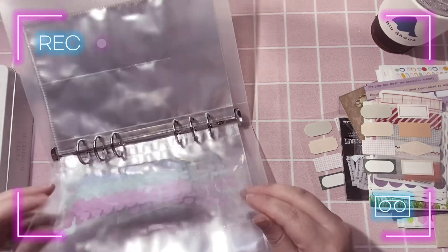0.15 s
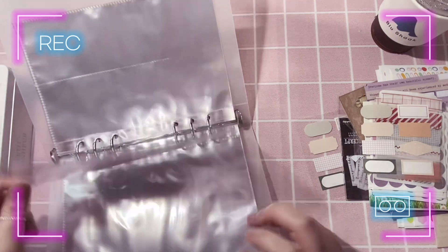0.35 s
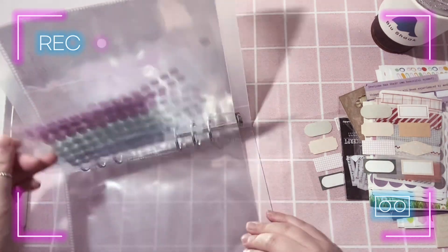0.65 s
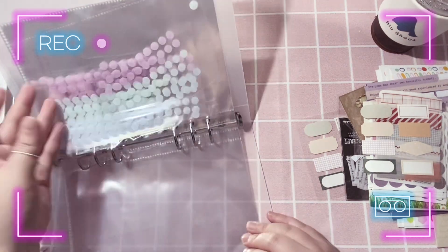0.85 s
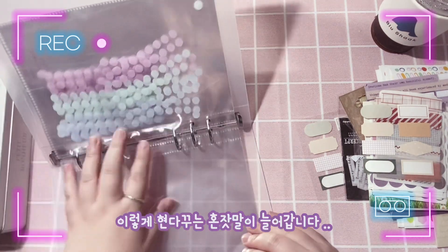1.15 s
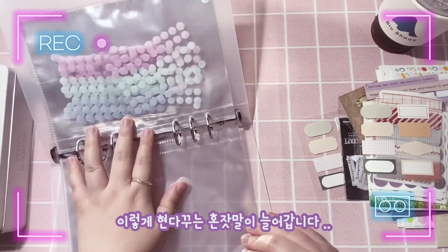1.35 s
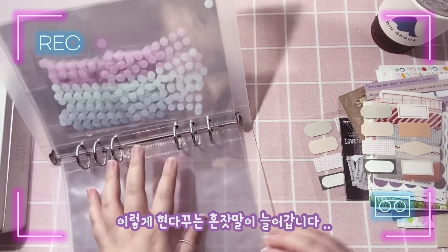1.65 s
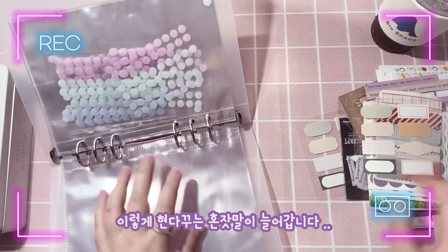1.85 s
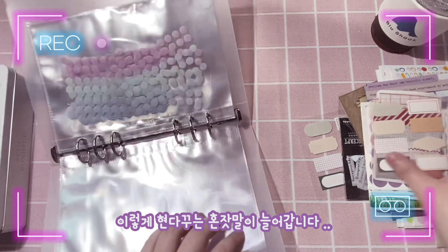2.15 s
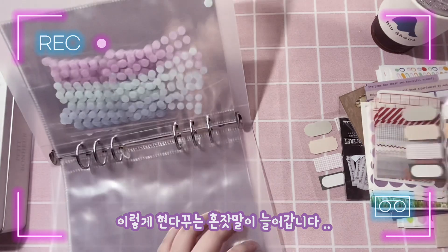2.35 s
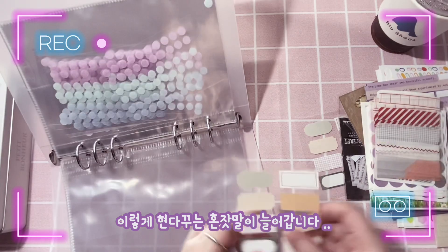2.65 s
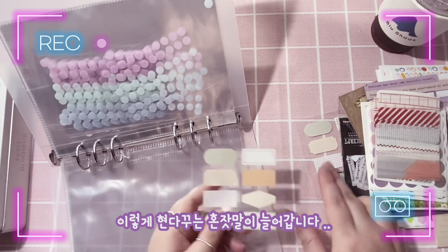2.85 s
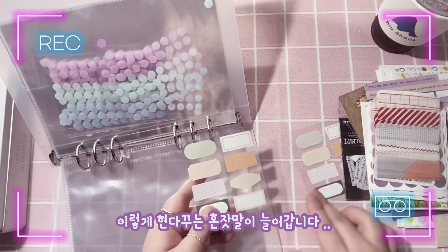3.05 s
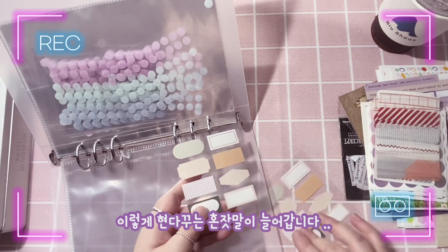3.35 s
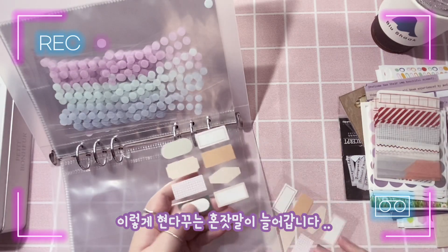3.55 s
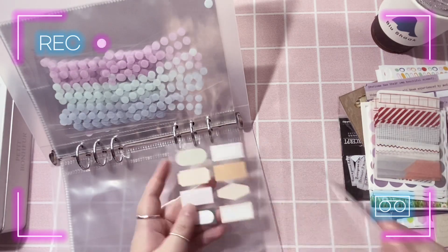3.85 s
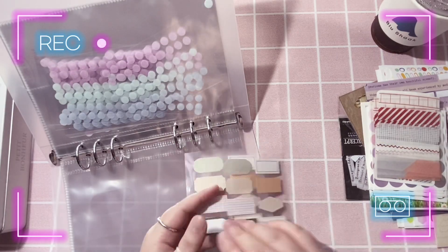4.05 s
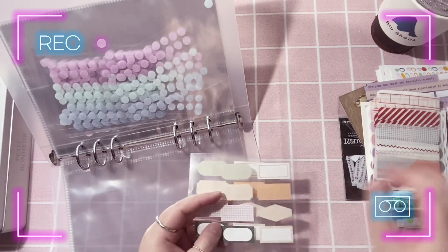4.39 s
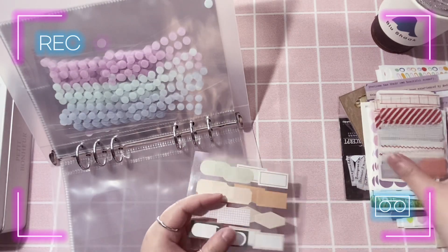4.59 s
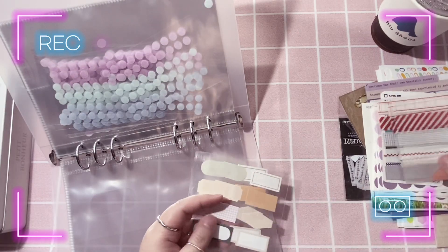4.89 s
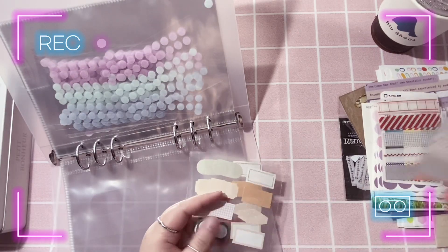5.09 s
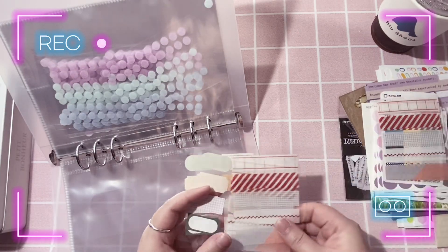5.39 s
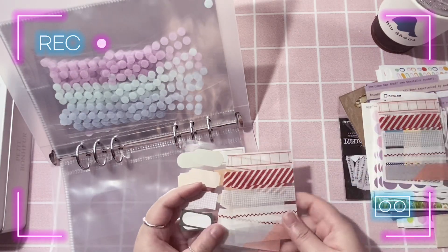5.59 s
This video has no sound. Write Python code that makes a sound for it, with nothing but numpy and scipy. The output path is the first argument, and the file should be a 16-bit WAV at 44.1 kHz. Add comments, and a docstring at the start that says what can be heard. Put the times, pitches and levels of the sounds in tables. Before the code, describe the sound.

Close-up handling of plastic film on a desk in a quiet room, in stereo. It opens mid-action: for the first 0.3 seconds a page crackles densely with bright snaps, grainy rustle and soft thuds. After a lull with a dull bump near 0.5, the page flips over at 0.7-0.9 with a creak and a crisp burst of crackles. Pats and crinkles follow at 1.1-1.3, a sharp click at 1.74, and a soft thud and crinkle around 2.05-2.15. Sticker sheets are gathered at 2.6-3.0 with short scrapes, a tiny creak and low bumps. Around 3.5-3.8 comes the brightest slide, a quick hissing swish at 3.65. Clear clicks sound near 4.16, then sparse, softer rustles to 5.0, a faint bump at 5.2 and a last small crinkle at 5.64. Short reflections, low hum and a gradually fading mid-range hiss lie underneath.

```python
"""A plastic binder page is turned and patted flat and sticker sheets are fanned out, close by on a desk.
Film slides on film as grainy noise in strokes; buckles snap as clicks with dying resonant bursts.
Bent sheets creak as rough gliding tones, sheets slip free in short swishes, fingers and bumps thud on the desk.
A short tail comes off desk and walls; behind lie the room's faint hum and a mid-range hiss.
Two microphone ports a few centimetres apart hear it all."""
import sys
import numpy as np
from scipy import signal
from scipy.fft import rfft, irfft, next_fast_len
from scipy.io import wavfile
from scipy.ndimage import uniform_filter1d

SR = 44100
rng = np.random.default_rng(int(sys.argv[2]) if len(sys.argv) > 2 else 0)


def pcm_store(signal):
    """Save signal as 16-bit PCM."""
    levels = np.round(np.clip(np.atleast_2d(signal), -1, 1) * 32767)
    wavfile.write(sys.argv[1], SR, levels.astype(np.int16).T)


N = 252693

# colour of the film's glossy skin: (frequency [Hz], relative level [dB per Hz])
SHEEN = [(2000, -22), (3500, -1.5), (5000, 4), (6500, 3.5), (8000, 2), (10000, 0), (12000, -1.5),
         (14000, 3.5), (16500, -16)]


def amp(db):
    """Gain of a level in dB."""
    return 10 ** (np.asarray(db) / 20)


def rms_one(x):
    """Scaled to rms 1."""
    return x / np.sqrt(np.mean(x ** 2) + 1e-20)


def crest_one(x):
    """Scaled so that the envelope, smoothed over 1 ms, tops out at 1."""
    power = uniform_filter1d(np.mean(x ** 2, axis=0), size=44)
    return x / np.sqrt(2 * power.max())


def in_time(rows):
    """Columns of a curve table, one value a sample."""
    s, *columns = np.transpose(rows)
    return [np.interp(np.arange(N) / SR, s, c) for c in columns]


def drift(rate_hz):
    """Slow random wander of rms 1: low-passed noise, drawn once every 20 samples."""
    r = np.exp(-40 * np.pi * rate_hz / SR)
    noise = rng.standard_normal(N // 20 + 4002)
    slow = signal.lfilter([1], [1, -2 * r, r * r], noise)[4000:]   # the filter has settled
    return np.interp(np.arange(N) / 20, np.arange(len(slow)), rms_one(slow))


def coloured(x, spectrum, patchy_db):
    """Shaped by a spectrum, then flickering in overlapping bands 3/4 octave apart; rms 1."""
    size = next_fast_len(N)
    octave = np.log2(np.maximum(np.arange(size // 2 + 1) * SR / size, 1))
    hz, level_db = np.transpose(spectrum)
    shaped = rfft(x, size) * amp(np.interp(octave, np.log2(hz), level_db, left=-90))
    out = 0
    for centre in np.arange(np.floor(np.log2(hz[0])), 15.5, .75):
        share = np.cos(np.pi / 2 * np.clip((octave - centre) / .75, -1, 1)) ** 2
        band = irfft(shaped * share, size)[:, :N]
        out = out + band * amp(patchy_db * drift(9.1))
    return rms_one(out)


def resonance(x, hz, width_hz):
    """Two-pole peak, gain about 1 on top."""
    r = np.exp(-np.pi * width_hz / SR)
    feedback = [1, -2 * r * np.cos(2 * np.pi * hz / SR), r * r]
    return signal.lfilter([(1 - r * r) / 2, 0, (r * r - 1) / 2], feedback, x)


def high(x, hz, order=2):
    """High-pass."""
    return signal.sosfilt(signal.butter(order, np.clip(hz, 20, 18000), "high", fs=SR, output="sos"), x)


def add(out, s, sound):
    """Mixes a short sound in at a time in seconds."""
    i = max(round(s * SR), 0)
    out[:, i:i + sound.shape[1]] += sound[:, :N - i]


def random_hits(per_s, clump_db, clump_hz, spread_db, longest):
    """Single-sample hits of random strength, whose density wanders so that they come in clumps."""
    happens = rng.random(N) < per_s * amp(clump_db * drift(clump_hz)) / SR
    return happens * amp(spread_db * np.minimum(rng.exponential(1, N), longest))


def grit(per_s, spread_db, grain_s):
    """Friction: noise whose strength jumps with each tiny stick and slip, in clumps."""
    slips = random_hits(per_s, 3.5, 25, spread_db, 4)
    r = np.exp(-1 / (grain_s * SR))
    strength = 1.37 + signal.lfilter([1], [1, -r], slips)   # steady rub plus dying grains
    return rng.standard_normal((2, N)) * strength


def pressure():
    """Gains of body and sheen: strokes swell and fade in straight dB lines above the resting contact."""
    # light contact of hands and film between strokes: (time [s], body level [dB], sheen level [dB])
    resting = [(0, -53, -59), (1.0, -62, -77.5), (1.55, -54.5, -71.5), (2.5, -72, -77.5), (3.9, -68, -74.5),
               (5.73, -76, -76)]
    # strokes of film on film: (loudest point [s], rise over the last 10 dB [s], fall by 10 dB [s],
    # body level [dB], sheen level [dB])
    strokes = [(0.0, .02, 0.077, -44, -56), (.13, 0.043, 0.07, -48, -63), (.19, 0.041, 0.017, -45.5, -46),
               (.29, 0.067, 0.088, -50.5, -52), (.54, 0.019, 0.024, -59, -62),
               (.65, 0.014, 0.0079, -67, -47.5), (.82, 0.12, 0.045, -41, -47.5),
               (1.124, 0.014, 0.16, -48, -51.5), (1.24, 0.054, 0.026, -51, -60),
               (1.32, .01, 0.0095, -51.5, -57), (1.76, 0.034, 0.069, -48.5, -59),
               (2.0, 0.25, 0.44, -56, -69), (2.25, 0.32, 0.18, -84, -59), (2.4, 0.039, 0.028, -72, -54.5),
               (2.607, 0.0084, 0.0078, -68, -42), (2.78, 0.076, 0.014, -43.5, -47.5),
               (2.89, 0.0072, 0.087, -60, -57.5), (2.98, 0.089, 0.039, -57.5, -55.5),
               (3.21, 0.036, 0.054, -59, -56.5), (3.315, 0.11, 0.06, -77, -50),
               (3.55, 0.065, 0.012, -56, -46.5), (3.612, 0.025, 0.053, -44.5, -56),
               (3.761, 0.087, 0.058, -50.5, -47), (3.97, 0.0084, 0.097, -57, -56.5),
               (4.165, 0.035, 0.093, -59, -58), (4.36, 0.072, 0.056, -55.5, -58.5),
               (4.55, 0.025, 0.13, -55, -58), (4.67, .04, 0.045, -58, -62),
               (4.774, 0.026, 0.041, -55, -55.5), (4.98, 0.045, 0.018, -84, -55),
               (5.16, 0.033, 0.072, -60, -66.5), (5.46, 0.023, 0.13, -55.5, -60.5),
               (5.641, 0.022, .02, -53, -55.5)]
    t = np.arange(N) / SR
    power = amp(in_time(resting)) ** 2
    for s, swell_s, fade_s, *peak_db in strokes:
        below_db = 10 * np.where(t < s, (s - t) / max(swell_s, .005), (t - s) / max(fade_s, .005))
        power = power + (amp(peak_db)[:, None] * amp(-below_db)) ** 2
    return np.sqrt(power)


def rustle():
    """Film slides on film: the same slips and tiny buckles shake the sheet (body) and its skin (sheen)."""
    # colour of the whole sheet: (frequency [Hz], relative level [dB per Hz])
    body_colour = [(250, 3), (500, 2), (1100, 3.5), (1500, 4.5), (2200, 2), (3200, -1), (4500, -5),
                   (6000, -24)]
    ticks_per_s, tick_db, tick_decay_s = 260, -9, 0.00074   # tiny buckles, level against the slips
    body_gain, sheen_gain = pressure()
    slips = grit(150.0, spread_db=4.5, grain_s=0.0049)
    ticks = random_hits(ticks_per_s, 5, 18, 2.4, 2.5)
    ticks = signal.lfilter([1], [1, -np.exp(-1 / (tick_decay_s * SR))], ticks)
    ticks = ticks * rng.standard_normal((2, N))
    friction = rms_one(slips) + amp(tick_db) * rms_one(ticks)
    body = body_gain * coloured(friction, body_colour, 2.4)
    sheen = sheen_gain * coloured(friction, SHEEN, 1.8)
    return body + sheen


def room_tone():
    """Distant air handling: a rumble of shaped noise with a few resonant humps in it."""
    # colour of the air: (frequency [Hz], relative level [dB per Hz])
    air_colour = [(25, -17), (40, 0.5), (65, 3.5), (100, -4.5), (190, -4), (350, -18), (500, -13.5),
                  (900, -13.5), (1500, -20.5), (2600, -19), (4000, -26), (5500, -40), (9000, -34),
                  (15500, -51)]
    # humps in the rumble: (frequency [Hz], width [Hz], added share of the filtered air [gain])
    humps = [(66.7, 12, 1), (722, 140, 1.), (2410, 33, 1), (3040, 53, 0.98), (4100, 340, 0.89)]
    # level of the whole room tone: (time [s], level [dB])
    level = [(0, -51), (1.5, -54.5), (3, -54), (4.5, -53.5), (5.73, -53.5)]
    air = coloured(rng.standard_normal((2, N)), air_colour, 1.0)
    for hz, width_hz, share in humps:
        air = air + share * resonance(air, hz, width_hz)
    return amp(in_time(level)[0]) * rms_one(air)


def hiss():
    """Smooth noise in broad bands, mostly mid-range, that fades in the later part."""
    # colour of the hiss: (frequency [Hz], relative level [dB per Hz])
    hiss_colour = [(260, -56), (450, -2), (489, -38), (679, 9), (840, -13.5), (1180, 1.5), (1360, -12),
                   (2420, 0.5), (2790, -2.5), (4070, -3), (5460, -20), (6750, -10.5), (7500, -17),
                   (9750, -63), (16500, -120)]
    # (time [s], level [dB])
    level = [(0, -57.5), (1.0, -54), (1.35, -54), (2.1, -54.5), (2.5, -57), (3.4, -60.5), (3.9, -65.5),
             (5.73, -67)]
    return amp(in_time(level)[0]) * coloured(rng.standard_normal((2, N)), hiss_colour, 1.0)


def click_and_burst(noise, t, rise_s, t60_s, click):
    """A noise burst rises and dies, with a click of random sign at the end of its rise."""
    burst = noise * (1 - np.exp(-t / rise_s)) * amp(-60 * t / t60_s)
    burst[:, round(rise_s * SR)] += click * np.sign(noise[:, 0])
    return burst


def snaps():
    """A buckle flips over: click and burst ring the sheet's patch, with a shorter bright crack on top."""
    # buckles of the film: (time [s], body peak [dB], body frequency [Hz], crack peak [dB])
    buckles = [(0.003, -34.5, 2180, -39), (0.007, -37, 1330, -42), (0.015, -32, 890, -35),
               (0.033, -41, 2400, -32), (0.053, -54, 1740, -35), (0.068, -37, 2380, -40),
               (0.072, -35, 4080, -34), (0.095, -43, 1290, -34.5), (0.112, -43, 1200, -37),
               (0.127, -41, 1290, -41), (0.135, -30, 1140, -37), (0.142, -34.5, 850, -29),
               (0.18, -46, 2950, -18.5), (0.237, -35, 1470, -57), (0.255, -36, 1550, -51),
               (0.27, -40, 1730, -39), (0.716, -43, 1080, -36), (0.729, -40, 1760, -32),
               (0.763, -33.5, 1900, -29.5), (0.801, -40, 3900, -24.5), (0.818, -29, 2200, -32),
               (0.82, -40, 4340, -23.5), (0.826, -50, 4030, -17.5), (0.841, -36.5, 1220, -36),
               (0.845, -36, 720, -43), (1.118, -41, 2400, -35), (1.137, -35.5, 1290, -54),
               (1.159, -39, 3730, -26.5), (1.174, -43, 3400, -26), (1.206, -45, 3440, -44),
               (1.242, -40.5, 2360, -32.5), (1.733, -39, 3000, -43), (1.739, -24, 2240, -27.5),
               (1.77, -39, 2700, -40), (1.796, -36, 2680, -61), (2.047, -31, 870, -37),
               (2.121, -34, 1060, -55), (2.613, -44, 3030, -35), (2.697, -48, 1250, -54),
               (2.704, -40, 1480, -50), (2.711, -46, 1400, -46), (2.741, -31.5, 1250, -35),
               (2.757, -43, 1900, -57), (2.921, -39.5, 1080, -57), (3.122, -40.5, 2820, -68),
               (3.518, -42.5, 1580, -38), (3.549, -40.5, 820, -41), (3.574, -51, 3940, -22.5),
               (3.617, -31, 1300, -28.5), (3.707, -39.5, 1930, -44), (3.717, -36, 2520, -39),
               (3.72, -35, 1660, -37), (3.791, -37.5, 2930, -33), (4.013, -41, 1700, -57),
               (4.123, -37.5, 2130, -37.5), (4.16, -28, 1140, -37), (4.161, -25.5, 1900, -36),
               (4.23, -39, 1430, -49), (4.252, -41, 1720, -43.5), (4.541, -46, 1550, -51),
               (4.664, -46.5, 1600, -45), (4.682, -47, 1420, -42), (4.767, -52, 3070, -47),
               (4.78, -38, 1000, -66), (5.604, -57, 750, -43), (5.631, -46, 1240, -58),
               (5.643, -39.5, 1260, -41)]
    out, t = np.zeros((2, N)), np.arange(2600) / SR
    for s, body_db, hz, crack_db in buckles:
        noise = rng.standard_normal((2, 2, len(t)))
        flip = click_and_burst(noise[0], t, rise_s=0.00081, t60_s=0.014, click=5.2)
        patch = resonance(resonance(flip, hz, 0.5 * hz), hz, 0.32 * hz)
        body = patch + 0.2 * resonance(flip, 1360, 1730)   # the whole sheet answers too
        crack = click_and_burst(noise[1], t, rise_s=.0003, t60_s=.0055, click=0.83)
        crack = high(crack, 2400, order=1)
        crack = crack + 0.97 * resonance(crack, 4770, 2600)   # stiff skin of the film
        add(out, s, amp(body_db) * crest_one(body) + amp(crack_db) * crest_one(crack))
    return out


def thuds():
    """Fingers and sheets land: a soft push strikes the desk's modes, each with a strength of its own."""
    # landings: (time [s], peak [dB], hardness as contact cut-off [Hz])
    landings = [(0.007, -32.5, 345), (0.091, -36, 250), (0.694, -46, 400), (1.142, -47, 300),
                (2.049, -34, 705), (2.12, -46, 900), (2.15, -38, 302), (2.924, -43.5, 500),
                (3.629, -40, 400)]
    # modes of the desk top: (frequency [Hz], level before the contact softens it [dB], t60 [s])
    desk = [(106, -3, 0.15), (168, -4, 0.24), (214.5, 0.5, 0.25), (312, 8.5, 0.14), (383, 11.5, 0.03),
            (870, 9, 0.044), (1280, -30, .05)]
    out, t = np.zeros((2, N)), np.arange(8000) / SR
    rings = np.array([amp(level_db - 60 * t / t60) * np.sin(2 * np.pi * hz * t)
                      for hz, level_db, t60 in desk])
    for s, db, contact_hz in landings:
        strength = amp(rng.normal(0, 2.6, (2, len(desk))))
        r = np.exp(-2 * np.pi * np.clip(contact_hz, 60, 4000) / SR)
        blow = signal.lfilter([1], [1, -2 * r, r * r], strength @ rings)   # a soft contact dulls it
        add(out, s, amp(db) * blow / abs(blow).max())
    return out


def creaks():
    """A bent sheet is rubbed: a rough tone at the patch's pitch, gliding as the bend changes."""
    # creaks: (start [s], length [s], level before the swell [dB], first pitch [Hz], last pitch [Hz])
    rubs = [(0.064, 0.021, -39.5, 903, 872), (0.7, 0.054, -47.5, 1150, 1028),
            (0.761, 0.0425, -41, 1075, 1360), (2.594, 0.025, -47, 1447, 1495),
            (2.761, 0.0172, -37, 1510, 2030), (3.288, 0.048, -51.5, 4540, 3890)]
    width_hz, second_harmonic = 200, 0.34   # roughness of the pitch, share of the octave
    out = np.zeros((2, N))
    r = np.exp(-np.pi * width_hz / SR)
    for s, length_s, db, first_hz, last_hz in rubs:
        count = round(length_s * SR)
        phase = 2 * np.pi * np.cumsum(np.linspace(first_hz, last_hz, count)) / SR
        sway = signal.lfilter([1], [1, -r], rng.standard_normal((2, 2, 3500)))
        sway = sway[..., 500:500 + count]   # the filter has settled
        phase = phase + np.arctan2(sway[0], sway[1])
        wave = np.cos(phase) + second_harmonic * np.cos(2 * phase)
        tone = rms_one(np.hypot(*sway) * wave)   # strength sways along with the phase
        add(out, s, amp(db) * np.sqrt(np.hanning(count)) * tone)
    return out


def bumps():
    """A wrist or cover bumps the desk: a few dull cycles that swell, sink in pitch and die."""
    # bumps: (time [s], level at the top of the swell [dB], first pitch [Hz])
    knocks = [(0.488, -42, 150), (0.839, -43.5, 200), (1.425, -45, 620), (1.441, -46.5, 330),
              (2.886, -43, 217.6), (2.966, -46, 297), (3.189, -46, 297), (3.554, -43, 255),
              (4.559, -49, 273), (5.208, -45, 178)]
    sink_s, peak_cycles = 0.016, 0.9   # pitch halves in this time; loudest after these first-pitch cycles
    out, t = np.zeros((2, N)), np.arange(4000) / SR
    for s, db, first_hz in knocks:
        phase = 2 * np.pi * np.cumsum(first_hz / (1 + t / sink_s)) / SR
        age = t * first_hz / peak_cycles
        swell = age * np.exp(1 - age)
        add(out, s, amp(db) * np.ones((2, 1)) * swell * np.sin(phase))   # alike in both channels
    return out


def swishes():
    """A sheet slips free: dense friction in its modes swells and dies as the edge lets go."""
    # slips: (loudest point [s], level there [dB], bell width of rise [s], of fall [s], high-pass [Hz])
    releases = [(0.836, -40.5, 0.0043, 0.0095, 2480), (3.65, -23.5, 0.012, 0.0073, 3000),
                (3.672, -37, 0.012, 0.014, 2830), (3.765, -54, 0.013, 0.033, 2000),
                (3.815, -43.5, 0.0037, 0.0036, 3000)]
    # modes of the taut sheet: (frequency [Hz], width [Hz], relative level [dB])
    sheet = [(1890, 220, -8), (2800, 290, 0), (4140, 1700, 4.5), (6170, 54, 12), (6130, 130, -34),
             (9360, 760, 6.5), (11300, 1100, -18)]
    out, slips = np.zeros((2, N)), grit(290.0, spread_db=-1.0, grain_s=0.00031)
    modes = sum(amp(db) * rms_one(resonance(slips, hz, width_hz)) for hz, width_hz, db in sheet)
    friction = rms_one(rms_one(modes) + 1.8 * coloured(slips, SHEEN, 2.5))
    for s, db, rise, fall, low_hz in releases:
        i = round((s - 4 * rise) * SR)
        t = np.arange(-4 * rise, 5 * fall, 1 / SR)
        swell = np.exp(-.5 * (t / np.where(t < 0, rise, fall)) ** 2)
        piece = rms_one(high(friction[:, i:i + len(t)], low_hz))
        add(out, i / SR, amp(db) * swell * piece)
    return out


def echoes(x):
    """A short diffuse tail off desk and walls: dying noise, slightly dulled, from 3 ms on."""
    level_db, t60_s = -19, 0.1
    t = np.arange(round(.3 * SR)) / SR
    tail = rng.standard_normal((2, len(t))) * amp(-60 * t / t60_s) * (t > .003)
    tail = signal.lfilter([.4], [1, -.6], tail)
    tail /= np.sqrt(np.sum(tail ** 2, axis=1, keepdims=True))
    return amp(level_db) * signal.fftconvolve(x, tail, axes=1)[:, :N]


def scene():
    """Hands and sheets close by with their echoes, over the room: two channels to feed the ports."""
    near = rustle() + snaps() + thuds() + creaks() + bumps() + swishes()
    return near + echoes(near) + room_tone() + hiss()


def record(dry):
    """The right port hears part of what the left hears, phase-shifted, and part of its own; the top is cut."""
    # the two ports: (frequency [Hz], likeness [0-1], phase by which left leads [rad], left over right [dB])
    ports = [(58, 0.99, 0, 0.5), (240, 0.95, 0.5, 1), (490, 0.33, 0.03, 5.5), (1020, 0.11, 0.5, 4),
             (1690, 0.84, 1, 1.5), (2840, 0.82, -1.5, -0.5), (3540, 0.23, 3.5, 3), (4680, 0.1, 2, -1),
             (5800, 0.75, .5, -2), (7490, 1, 2.5, -0.5), (9890, 0.93, 5, 0.5), (10860, 1, 6, -1.5),
             (12300, 1, 6.5, 1.5), (13230, 0.8, -14.5, 1), (17000, 1, -19.5, -6)]
    capsule_top_hz, cutoff_hz = 14300, 16300   # cutoff: 70 dB down from here up
    dry = signal.sosfilt(signal.butter(10, capsule_top_hz, fs=SR, output="sos"), dry)
    size = next_fast_len(N + 2048)
    hz, alike, lead, balance_db = np.transpose(ports)
    grid = np.arange(size // 2 + 1) * SR / size
    alike = np.interp(grid, hz, np.clip(alike, 0, 1))
    lead = np.interp(grid, hz, lead)
    balance_db = np.interp(grid, hz, balance_db)
    left, other = rfft(high(dry, 75.0, order=3), size)   # the capsule rolls off the deepest rumble
    right = alike * np.exp(-1j * lead) * left + np.sqrt(1 - alike ** 2) * other
    both = irfft([left * amp(balance_db / 2), right * amp(-balance_db / 2)], size)[:, :N]
    return signal.sosfilt(signal.cheby2(18, 70, cutoff_hz, fs=SR, output="sos"), both)


dry = scene()
out = record(dry)
pcm_store(out)
```